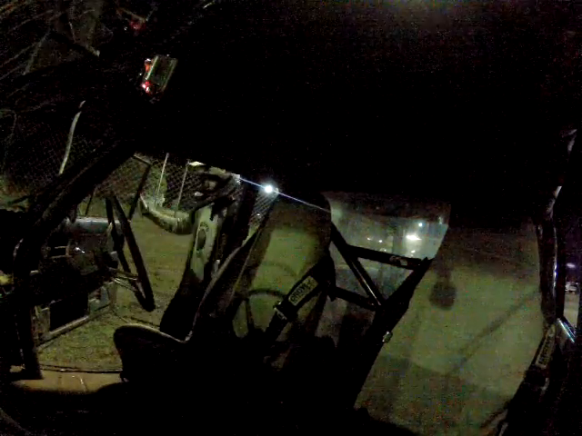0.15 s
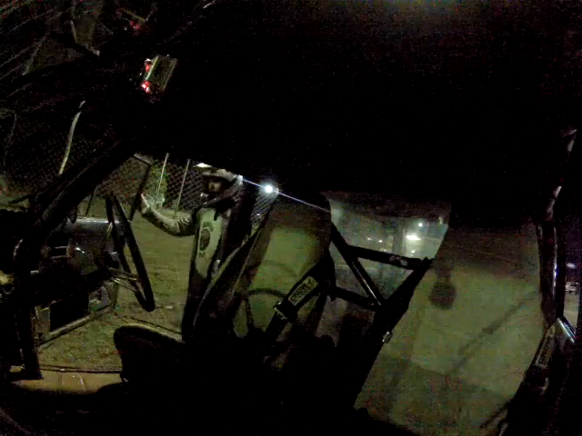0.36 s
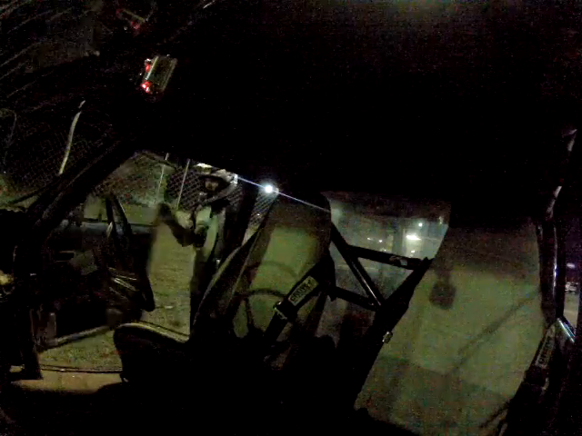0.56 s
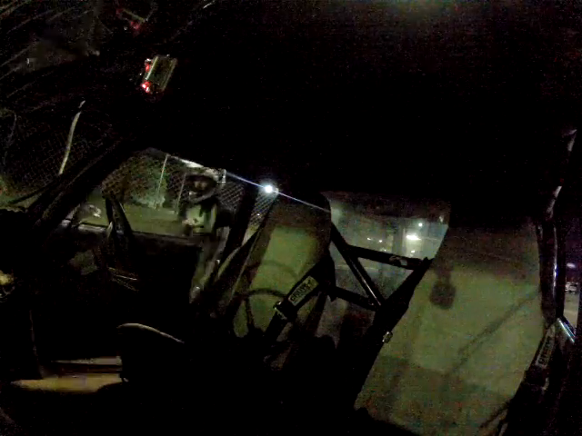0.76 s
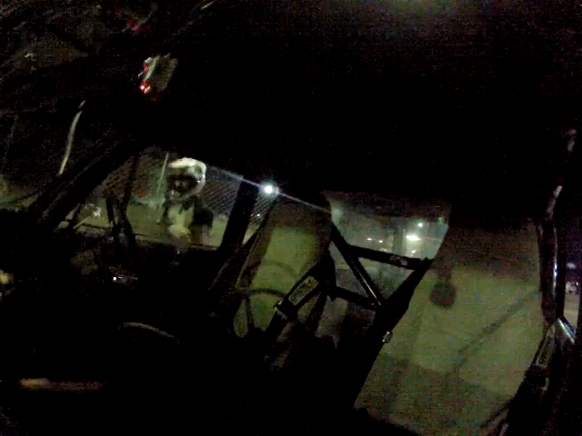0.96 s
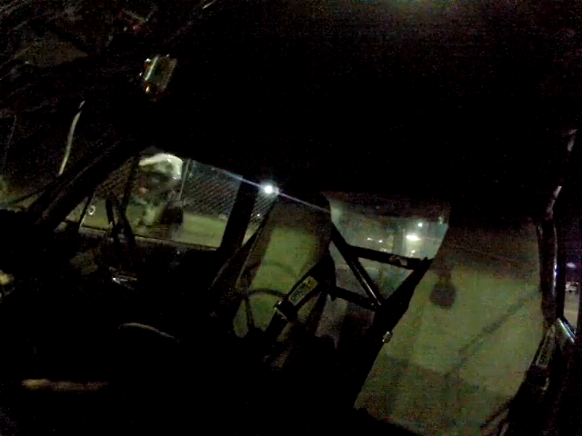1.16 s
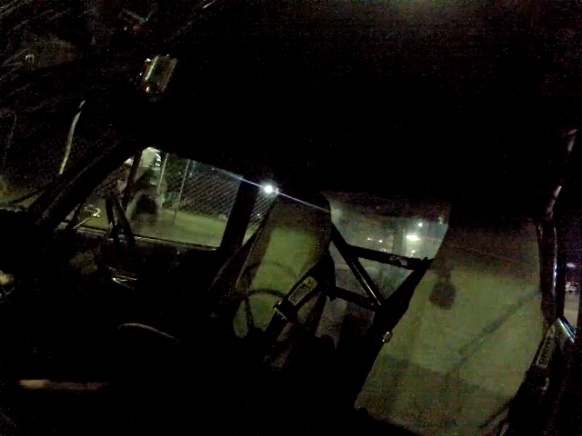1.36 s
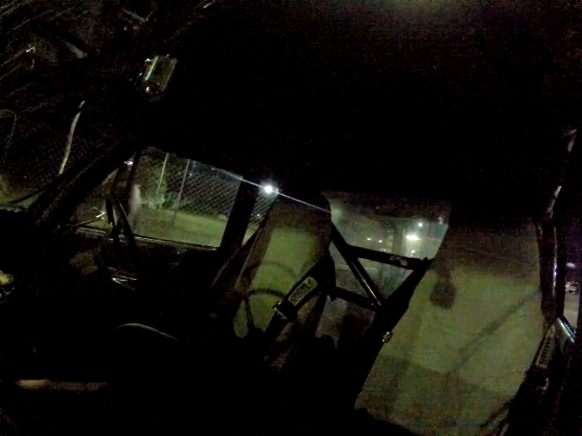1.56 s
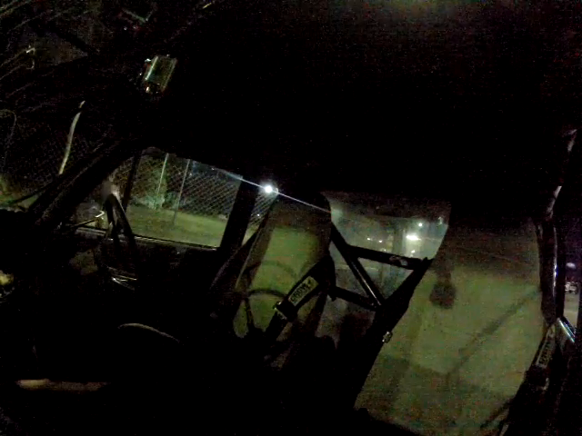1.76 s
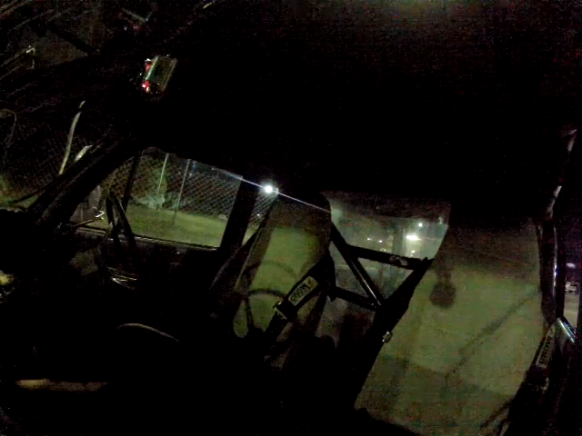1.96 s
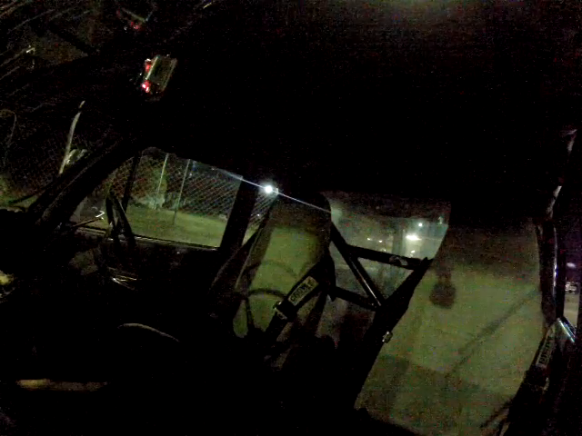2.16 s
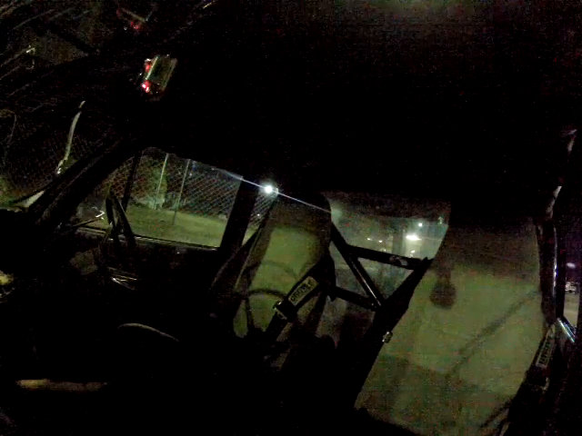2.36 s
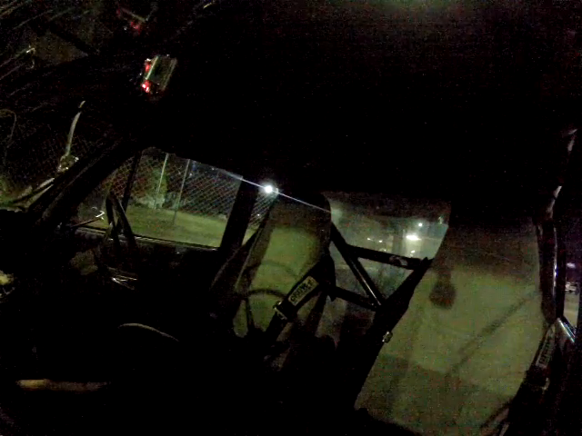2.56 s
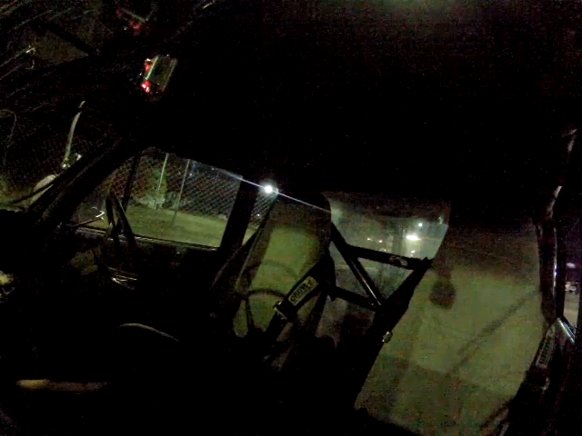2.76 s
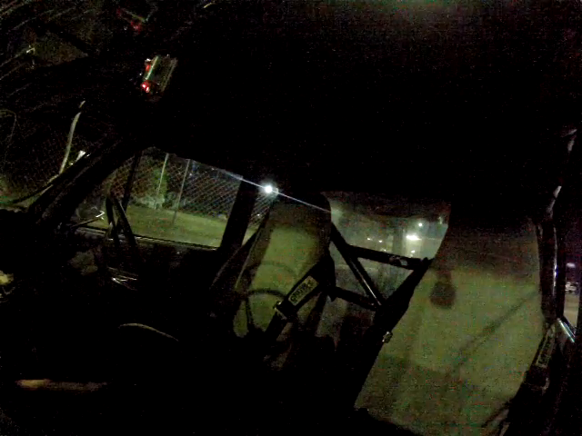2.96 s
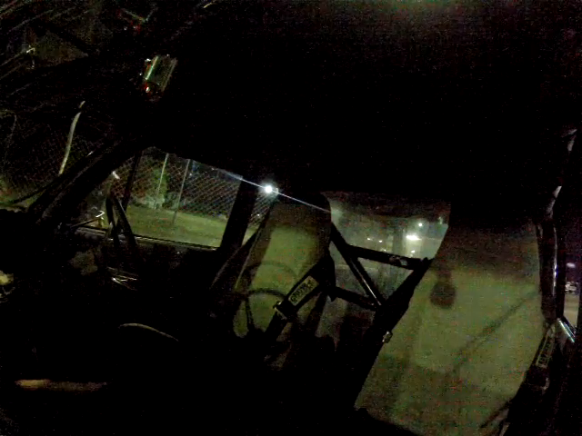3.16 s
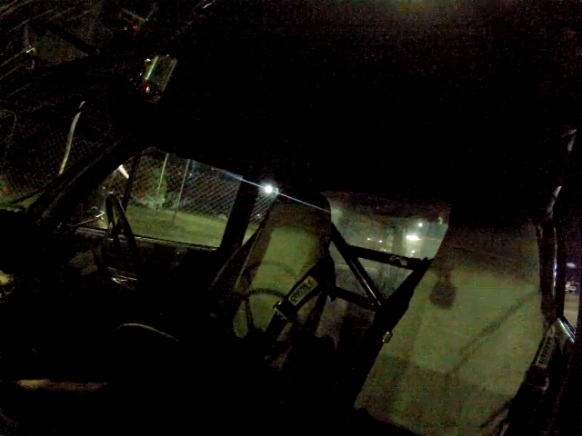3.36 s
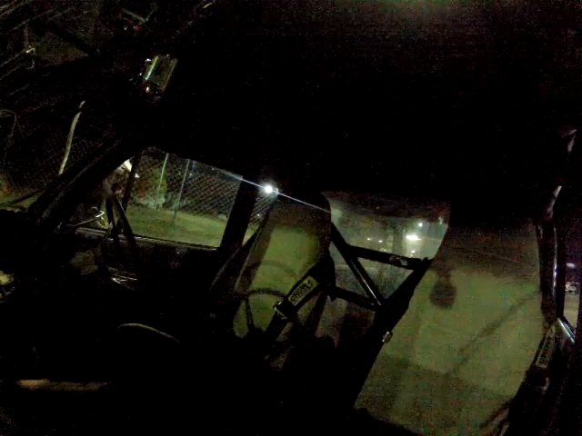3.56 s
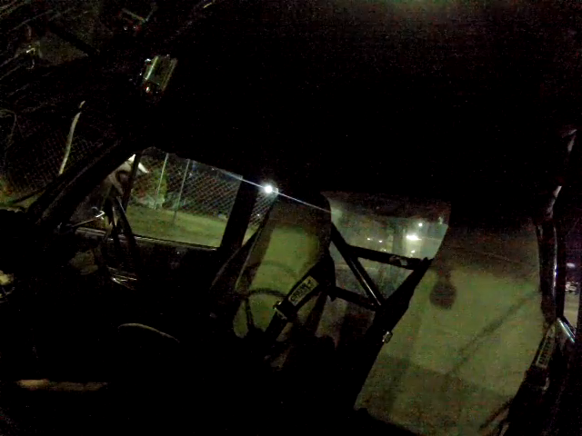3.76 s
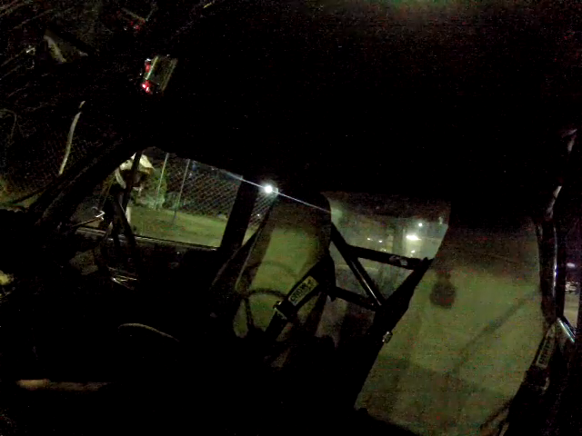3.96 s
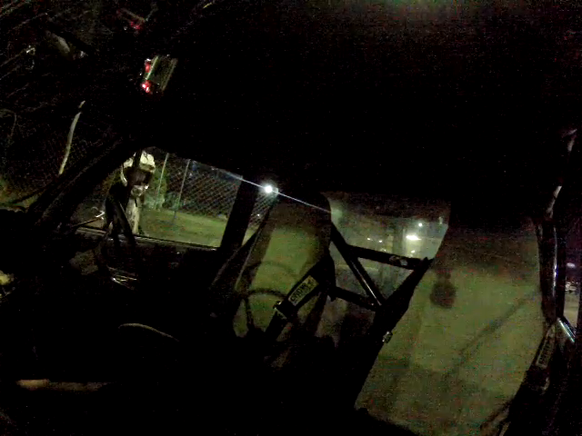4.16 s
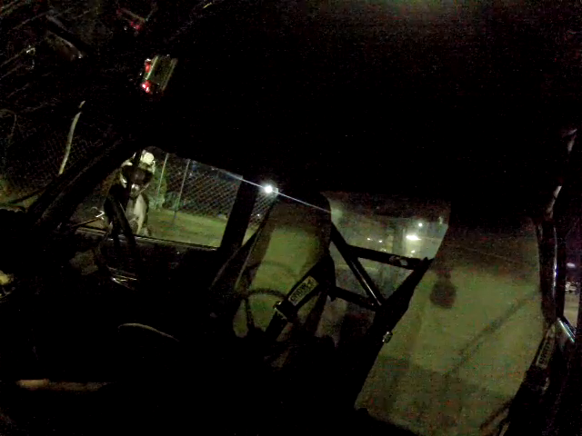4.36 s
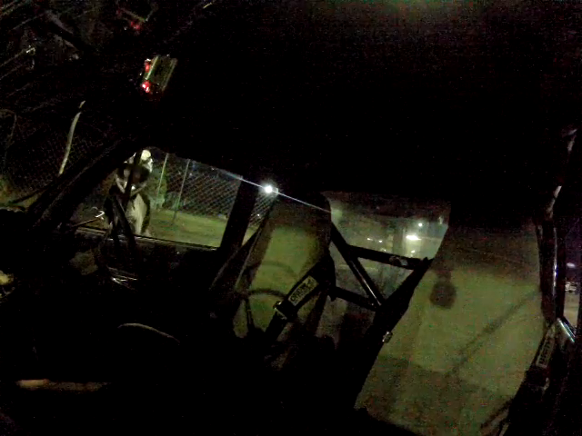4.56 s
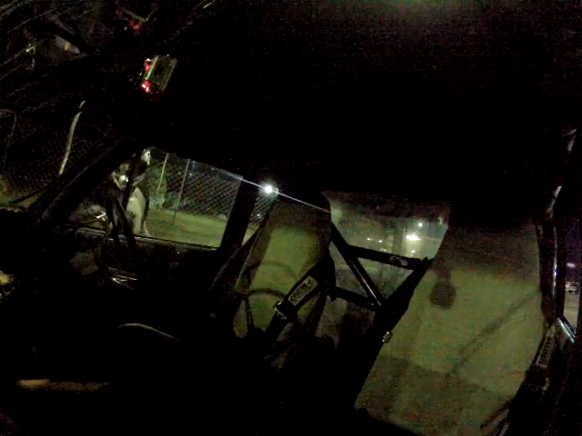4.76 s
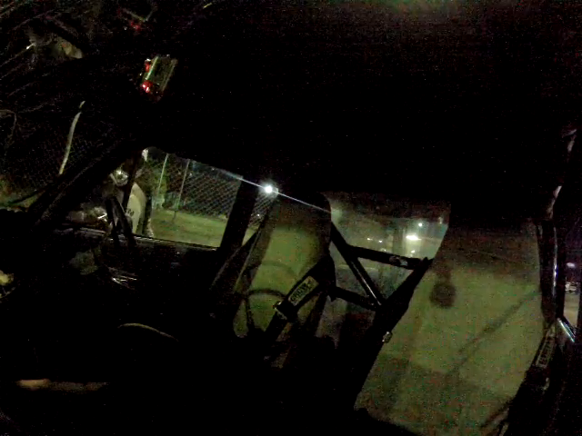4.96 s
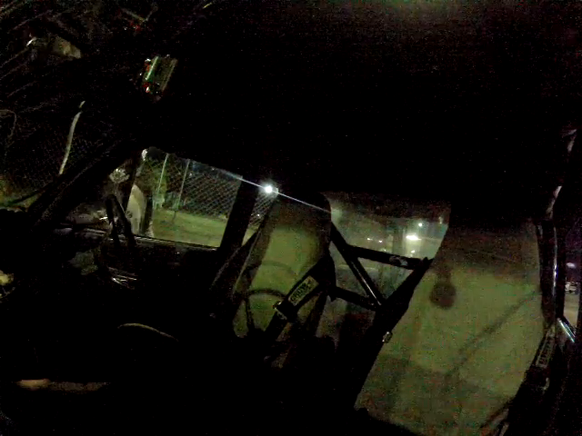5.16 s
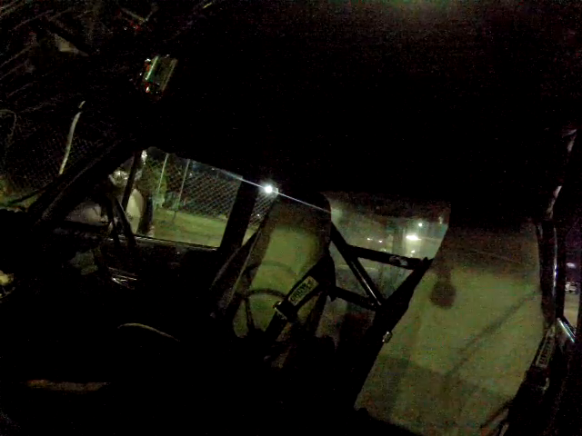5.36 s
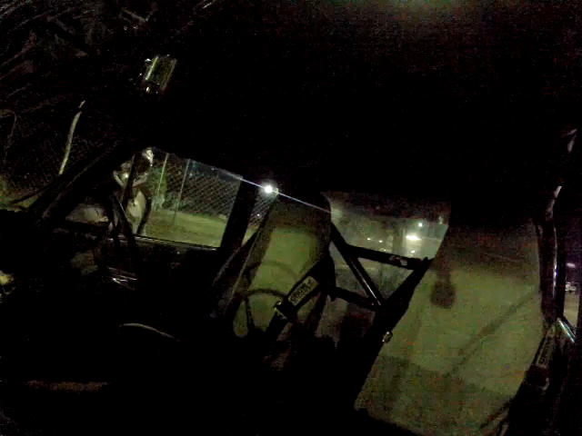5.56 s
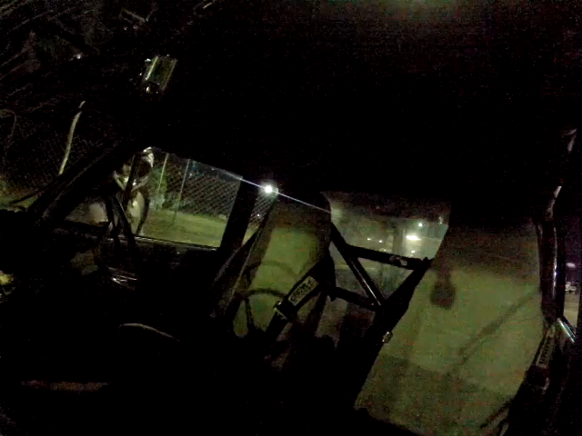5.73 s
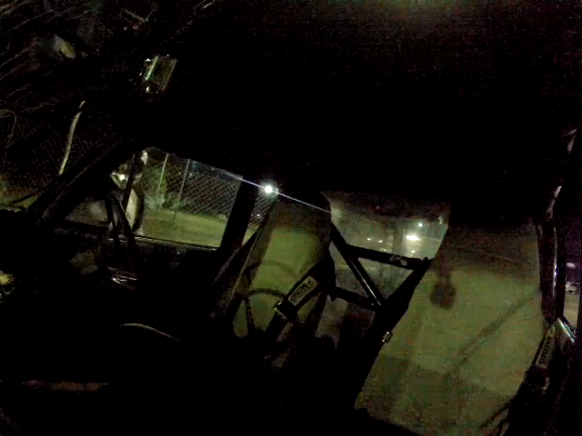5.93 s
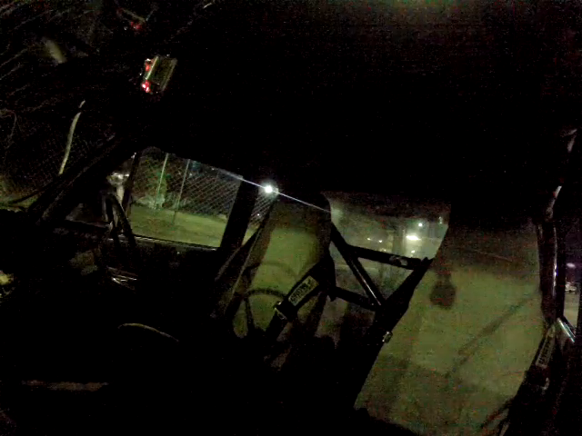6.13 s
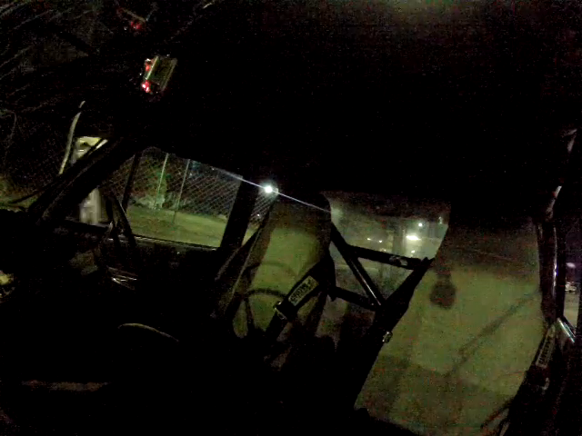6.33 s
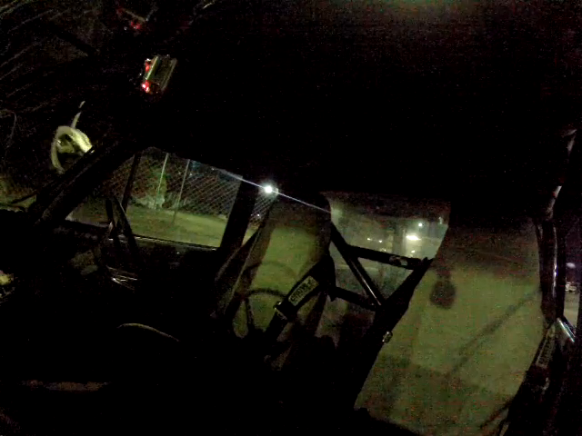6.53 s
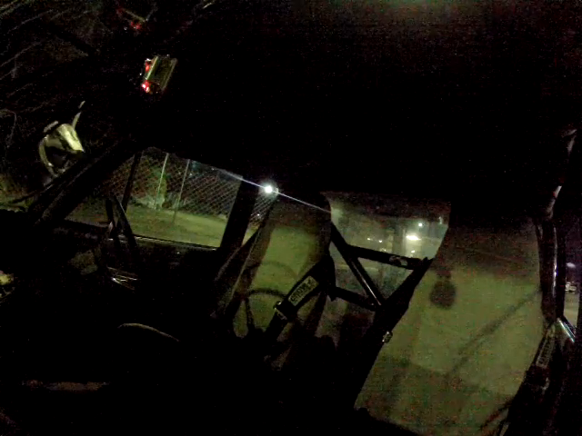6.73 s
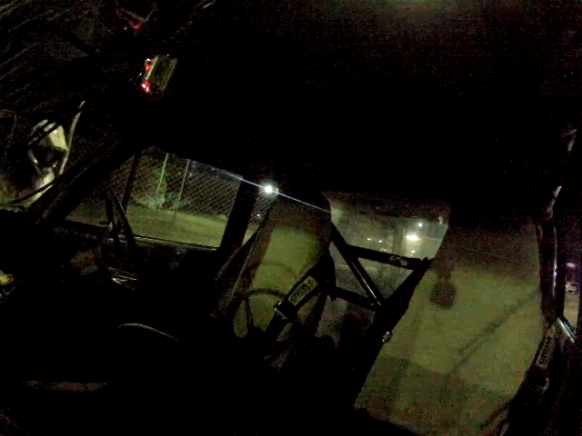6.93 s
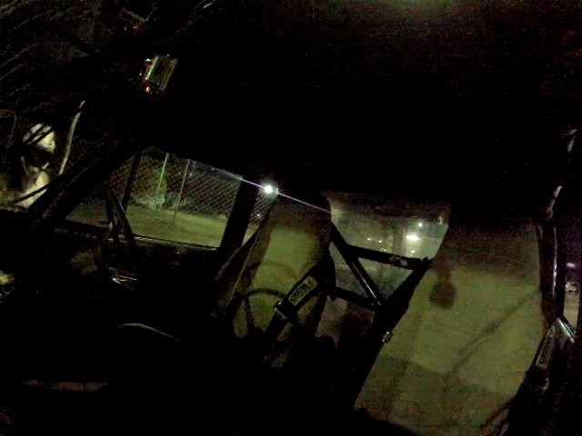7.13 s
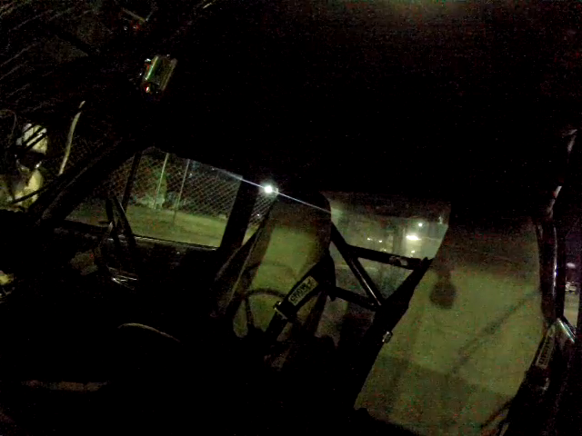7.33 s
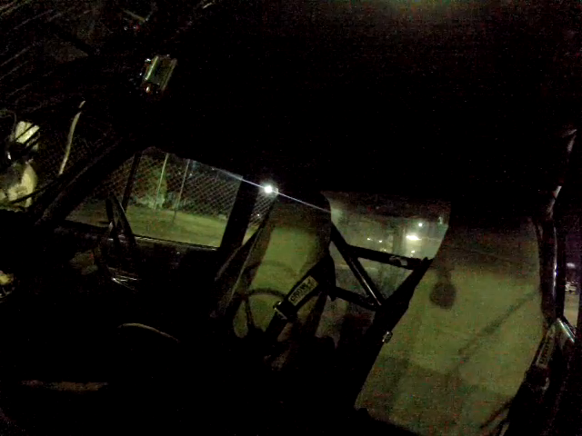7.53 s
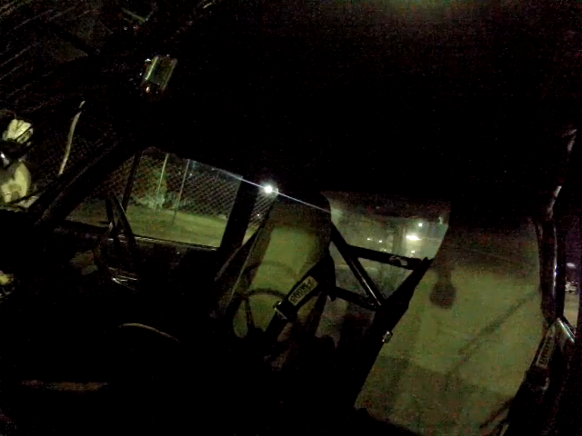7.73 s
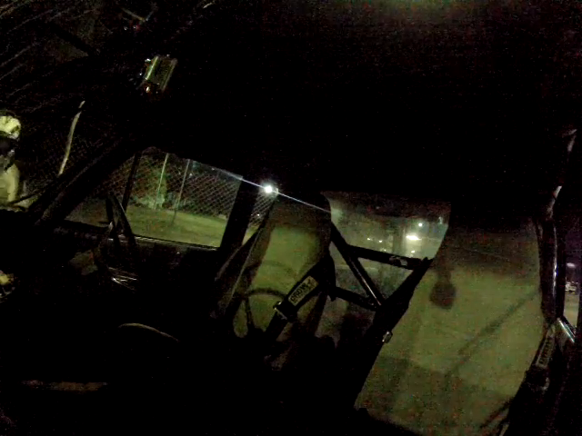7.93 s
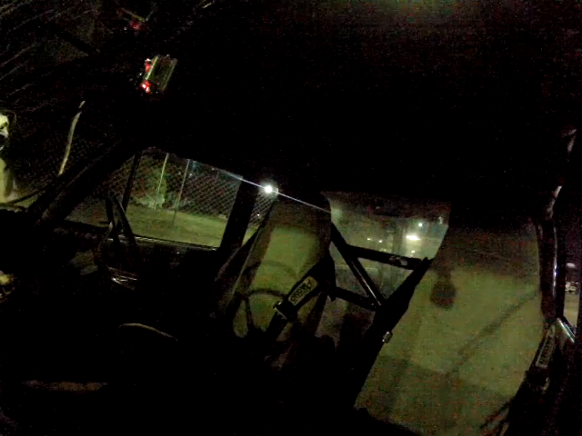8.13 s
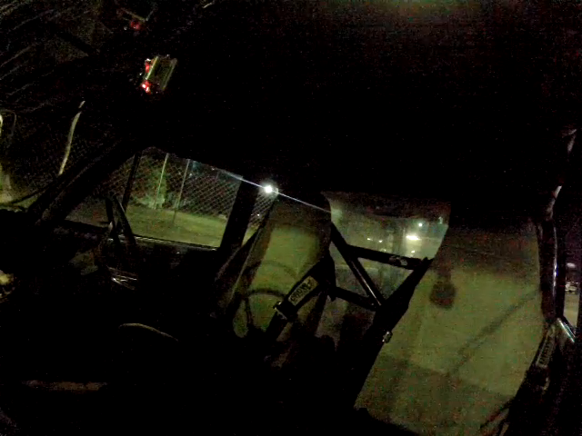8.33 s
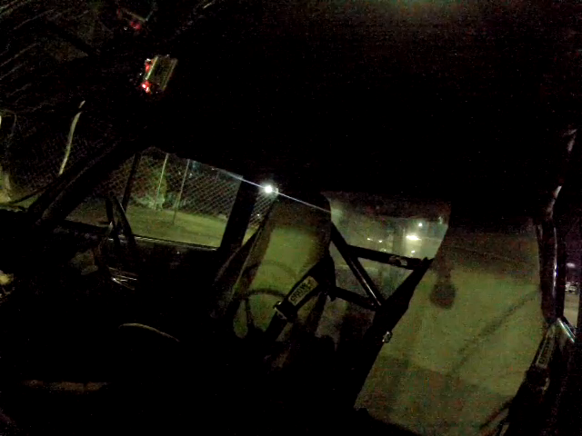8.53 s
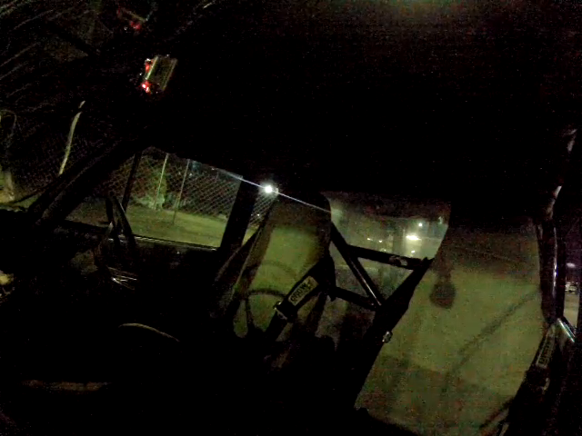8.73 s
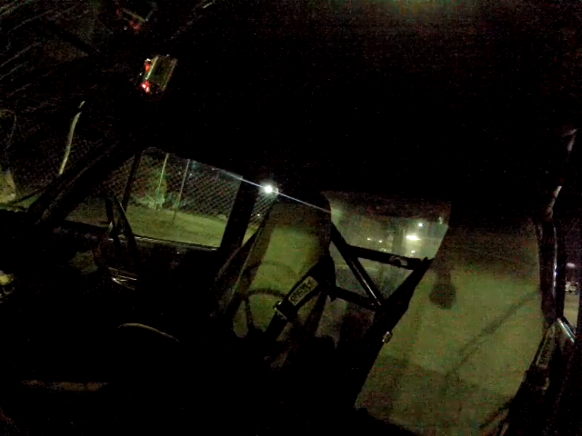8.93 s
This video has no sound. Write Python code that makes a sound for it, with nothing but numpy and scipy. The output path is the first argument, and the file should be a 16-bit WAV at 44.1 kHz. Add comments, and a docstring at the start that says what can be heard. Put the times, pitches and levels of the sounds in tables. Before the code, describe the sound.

The sound is heard from inside a stripped race car through a small, nearly mono microphone. A few gritty metal door clicks come close by in the first 0.7 seconds. At about 0.9 seconds the door slams, by far the loudest event: a deep boom, rattling panels and a brief metallic ring, slightly overloaded, with small knocks until 1.5 seconds. Outside, much quieter, a lumpy, muffled idle runs over a steady rumble of distant engines. Another engine is blipped with a raspy bark at about 2.3 and 2.6 seconds, then longer at 3.1 and 4.5. Light clicks come near 4.6 and 6 seconds, and a soft, low bump at 5.3. From about 6 seconds a car pulls away, its rough exhaust climbing in pitch. A second follows with a faint whistle, accelerating at 6.5 and 8 seconds. Both ease off around 9 seconds.

```python
"""A car door clicks a few times close to the microphone, then slams: the cabin air booms and panels rattle.
We sit inside a stripped race car at night. Outside, an eight-cylinder engine idles, another is blipped,
and two more pull away up through their revs; firings ring each exhaust pipe, and rushing gas rasps.
Far engines blur into a rumble. The microphone, all but mono, is in a small camera whose case rings
at a few pitches; the slam overloads it."""
import sys
import numpy as np
from scipy import signal
from scipy.fft import rfft, irfft
from scipy.io import wavfile
from scipy.ndimage import uniform_filter1d, map_coordinates

SR = 44100
rng = np.random.default_rng(int(sys.argv[2]) if len(sys.argv) > 2 else 0)


def file_out(sig):
    """Save sig as 16-bit WAV at sys.argv[1]."""
    # one column per channel
    cols = np.atleast_2d(sig).T
    # limit, then scale
    lim = np.clip(cols, -1, 1)
    pcm = np.round(lim * 32767).astype(np.int16)
    wavfile.write(sys.argv[1], SR, pcm)


N = 400869
TIME = np.arange(N) / SR
FREQS = np.maximum(np.arange(N + 1) * SR / (2 * N), 1)

# spectrum of a knocked body panel: pitch_hz, level_db
PANEL_SPECTRUM = [(50, -24), (110, 13), (170, -2), (240, 6), (310, -10), (440, -20.5), (560, -24),
                  (800, -50.5)]
# resonances of the latch plate and striker: pitch_hz, width_hz, level_db
STRIKER_MODES = [(1810, 30, 5), (1940, 47, 4.5), (2160, 18, -14), (2293, 21, -8), (2430, 8.5, -4),
                 (2750, 41, -8), (2920, 30, -21), (4080, 15, -5)]


def door_slam():
    """The door lands and rebounds, close by: air booms, panels thud, metal chatters, the latch rings."""
    # blows on the body shell (the door's stop, the slam, its rebounds, one late bump):
    # start_s, boom_db, thud_db, clatter_db, clatter_t60_s, latch_db
    blows = [(0.512, -56, -30.5, -54, 0.18, -51), (0.824, -45, -32, -48.5, 0.31, -51),
             (0.861, 6, -14.5, -17.5, 0.38, -24), (0.920, -1, -12.5, -29, 0.15, -43),
             (0.948, -35, -24, -15.5, 0.15, -25.5), (1.000, 3.5, -17.5, -41, 0.46, -55),
             (1.088, 0, -22, -35, 0.16, -34.5), (1.178, -24, -40, -48.5, .1, -58),
             (1.249, -9, -38.5, -57, .15, -65), (5.276, -18.5, -43.5, -61, .14, -72)]
    # modes of the door skin and roof: pitch_hz, level_db, t60_s
    skin_modes = [(86.7, 4.5, 0.65), (103.6, -11, 0.86), (231, -8, 0.62), (251.2, -8, 0.57),
                  (267, -17, 1.34), (329, -17.5, 0.67), (389, -12.5, 0.44), (440.4, -12, 0.33)]
    # spectra of the door skin's dry slap and of loose metal: pitch_hz, level_db
    slap_spectrum = [(300, 1.5), (440, 2.5), (650, -9.5), (1100, -6), (2000, -22.5)]
    clatter_spectrum = [(500, -1.5), (700, -9.5), (950, -11), (1150, -3.5), (1550, -12), (2050, 0),
                        (2900, -5.5), (3500, -9.5), (4200, -7.5), (5500, -18), (9700, -12.5),
                        (11000, -23.5), (13000, -25), (14500, -14.5), (15500, -11.5)]
    # thin ring of a metal fitting: pitch_hz, width_hz, level_db
    fitting_modes = [(11840, 63, 5), (12020, 55, -1.5), (1960, 27, -5)]
    start_s, boom_db, thud_db, clatter_db, clatter_t60_s, latch_db = np.transpose(blows)
    push_s = start_s + 0.00504  # air and panels move just after the metal touches
    boom = cabin_boom(push_s, boom_db)
    thud = colour(noise() * bursts(push_s, thud_db, t60=0.78, rise=0.0024), PANEL_SPECTRUM)
    skin = strike(push_s, thud_db - 2.5, skin_modes)
    slap = colour(noise() * bursts(push_s, thud_db - 12, t60=0.31, rise=0.0024), slap_spectrum)
    chatter = noise() * unit(undb(0.6 * walk(450)))  # many tiny metal contacts
    clatter = colour(chatter * bursts(start_s, clatter_db, clatter_t60_s, rise=0.0051), clatter_spectrum)
    latch = ringing(STRIKER_MODES) * bursts(start_s, latch_db, t60=0.19, rise=0.007)
    ring = ringing(fitting_modes) * bursts(start_s, clatter_db - 32, t60=1.53, rise=0.0062)
    clatter = cabin(clatter, t60=0.09, wet_db=-12, above_hz=860)
    return boom + thud + skin + slap + clatter + latch + ring


def cabin_boom(start_s, level_db):
    """The cabin air's main mode: it sags in pitch while the door still bounces on its seal."""
    mode_hz, sag_hz, recovery_s = 67.3, 16.9, 0.2515
    since_slam = np.maximum(TIME - start_s[np.argmax(level_db)], 0)
    turns = np.cumsum(mode_hz - sag_hz * np.exp(-since_slam / recovery_s)) / SR
    turns -= turns[since_slam == 0][-1]  # the hardest blow starts at zero phase
    swell = bursts(start_s, level_db, t60=0.25, rise=0.0047)
    after_ring = bursts(start_s, level_db - 22, t60=2.8, rise=0.02)
    return -np.sin(2 * np.pi * turns) * np.hypot(swell, after_ring)


def door_clicks():
    """Gritty metal clicks, close by; each rings the latch plate and knocks the panel behind it."""
    # latch, hinge and loose fittings: start_s, level_db, t60_s, treble_db
    clicks = [(0.107, -32, 0.099, -3), (0.332, -42.5, 0.1, 8), (0.38, -53.5, 1, -6.5),
              (0.509, -25, 0.092, -2.5), (0.62, -49.5, .11, 0.5), (0.714, -50, 0.33, -17),
              (1.232, -37, 0.042, -16), (1.489, -25.5, 0.025, -37), (1.536, -35, 0.04, -33),
              (4.609, -34, 0.058, -17), (5.848, -47.5, 0.091, -4.5), (6.086, -62, 0.26, 2),
              (6.174, -48.5, 0.13, 0.5)]
    # spectrum of the latch's grit: pitch_hz, level_db
    grit_spectrum = [(500, 8.5), (800, 2.5), (1050, 9), (1400, -2), (1900, 2), (2400, 2.5), (3300, -13.5),
                     (4300, -12.5), (5000, -22.5), (6000, -29), (8500, -17), (10100, -10), (11500, -27.5),
                     (14300, -13.5), (15500, -12.5)]
    start_s, level_db, t60_s, treble_db = np.transpose(clicks)
    bright_db = level_db + treble_db
    grit = colour(noise() * unit(undb(1.2 * walk(600))), grit_spectrum)
    low = passband(grit, "low", 3000) * bursts(start_s, level_db + 0.3, t60_s, rise=0.014)
    high = passband(grit, "high", 3000) * bursts(start_s, bright_db + 4.5, t60_s, rise=0.0042)
    ring = ringing(STRIKER_MODES) * bursts(start_s, bright_db - 10.5, t60=0.059, rise=0.0045)
    knock = colour(noise() * bursts(start_s, level_db - 9.5, t60=0.28, rise=0.002), PANEL_SPECTRUM)
    return low - high + ring + knock


def idling_engine():
    """A lumpy idle outside; only its bass gets into the cabin."""
    # loudness of the idle: time_s, level_db
    levels = [(0, -39), (0.2, -32.5), (2.2, -38), (2.8, -35.5), (3.7, -34.5), (4.25, -41.5), (4.85, -33),
              (5.8, -42.5), (9.09, -42.5)]
    # spectrum of the exhaust pipe: pitch_hz, level_db
    pipe = [(25, -50.5), (42, -6), (57, 6.5), (78, -6), (103, 5.5), (150, -11), (220, -16), (280, -13),
            (380, -40), (600, -44.5)]
    level_db, = curves(levels)
    firing_hz = 52.5 * (1 + 0.025 * walk(4))
    exhaust, _, _ = engine(firing_hz, pipe, lumpy=0.93, scatter_db=5, wander=0.02552, puff=0.4)
    return exhaust * undb(level_db - 1.5)


def blipped_engine():
    """Stabs of throttle outside: the exhaust barks and rasps as the revs climb, and dulls as they fall."""
    # stabs of throttle: start_s, held_s, firing_rise_hz, rasp_db
    stabs = [(2.27, .12, 13.1, -54.5), (2.56, 0.22, 24.5, -52.5), (3.08, .61, 60, -51),
             (4.45, 0.41, 57, -50.5)]
    # spectra of the exhaust pipe and of its gas rasp: pitch_hz, level_db
    pipe = [(40, -55.5), (70, 10), (105, 14.5), (160, 2), (215, -7), (240, -6.5), (285, 2), (335, -7),
            (400, -16.5), (600, -32), (950, -23.5), (1500, -52)]
    rasp_spectrum = [(500, -24), (720, 5), (1000, 4), (1250, -9.5), (1550, -16.5), (1950, -5), (2500, -8.5),
                     (2900, -10), (3500, -7.5), (4600, -12), (6000, -20), (9500, -13), (11000, -25),
                     (15000, -17.5)]
    # resonances of the exhaust under throttle: pitch_hz, width_hz, level_db
    bark_modes = [(807, 94, 0), (960, 62, 4), (1122, 30, -9), (2780, 31, -6), (2910, 61, -5.5)]
    rest_hz, db_per_hz, load_db = 100.7, 0.1586, 6.5
    firing_hz, drive = throttle(stabs, rest_hz, fall_s=0.62, attack_s=0.077, release_s=0.07)
    load = drive / drive.max()
    strength = drive + undb(-67.5 + 0.2 * (firing_hz - rest_hz))  # some rasp stays off the pedal
    exhaust, pulses, gas = engine(firing_hz, pipe, lumpy=2.2, scatter_db=0.9, wander=0.002, puff=0.94)
    exhaust_db = -52 + db_per_hz * (firing_hz - rest_hz) + load_db * load
    bark = unit(resonate(pulses, bark_modes)) * np.sqrt(load) * strength * undb(-8)  # dies before the rasp
    rasp = colour(gas, rasp_spectrum) * strength * undb(-5)
    return exhaust * undb(exhaust_db) + bark + cabin(rasp, t60=0.1, wet_db=4.5, above_hz=1020)


def leaving_car():
    """A car pulls away at full throttle: a rough, climbing exhaust note under a fluttering gas rasp."""
    # its run up through the revs: time_s, firing_hz, exhaust_db, rasp_db
    run = [(5.95, 130, -81, -102), (6.2, 142, -56, -58.5), (6.5, 190, -39, -54), (7, 224, -47.5, -50),
           (7.3, 246, -42.5, -49.5), (7.85, 276, -38.5, -55.5), (8, 268, -40, -53),
           (8.35, 287, -39.5, -51.5), (8.6, 272, -47, -49), (9.09, 280, -63, -51)]
    # spectra of the exhaust pipe and of its gas rasp: pitch_hz, level_db
    pipe = [(50, -38), (100, 12.5), (150, 6.5), (210, -1.5), (285, -8.5), (380, -18.5), (490, -12),
            (570, -21), (660, -36), (750, -18), (880, -40), (1200, -30.5)]
    rasp_spectrum = [(400, 1), (750, -6), (850, -5), (950, -1), (1100, -1.5), (1500, -11), (1950, -0.5),
                     (2350, -1), (2950, -5.5), (3700, -9), (4800, -13.5), (6000, -21), (8000, -15.5),
                     (9700, -10), (10800, -26.5), (14600, -13)]
    firing_hz, exhaust_db, rasp_db = curves(run)
    exhaust, _, gas = engine(firing_hz, pipe, lumpy=0.31, scatter_db=2, wander=0.005, puff=1)
    rasp = colour(gas, rasp_spectrum) * undb(rasp_db - 3 + 0.5 * walk(22))
    note = exhaust * undb(exhaust_db + 2.2 * walk(14))
    return note + cabin(rasp, t60=0.083, wet_db=-6, above_hz=450)


def chasing_car():
    """A second car follows in two long pushes; its gas whistles, a little higher as the revs rise."""
    # pushes of throttle: start_s, held_s, firing_rise_hz, whistle_db
    pushes = [(6.5, 0.97, 65.8, -61), (8.02, .75, 30.01, -56.5)]
    # spectrum of the exhaust pipe: pitch_hz, level_db
    pipe = [(80, -14), (130, 1), (210, -6), (280, 1.5), (350, -15), (450, -36.5)]
    # resonances the gas whistles through when firing at reference_hz: pitch_hz, width_hz, level_db
    whistle_modes = [(1805, 8.8, -6), (1900, 12, -8), (2268, 17, 0.5), (2360, 15, 3), (2740, 17, -3),
                     (2980, 7.8, 2), (3680, 20, -7)]
    reference_hz, glide = 216.2, 0.18
    firing_hz, strength = throttle(pushes, rest_hz=160.5, fall_s=1.8, attack_s=0.11, release_s=0.69)
    exhaust, _, gas = engine(firing_hz, pipe, lumpy=1, scatter_db=5, wander=0.012, puff=0.53)
    steady_whistle = unit(resonate(gas, whistle_modes))
    pitch_ratio = (firing_hz / reference_hz) ** glide
    whistle = map_coordinates(steady_whistle, [np.cumsum(pitch_ratio)], mode="mirror")
    return (exhaust * undb(11) + whistle) * strength


def engine(firing_hz, pipe, lumpy, scatter_db, wander, puff):
    """Eight cylinders fire unevenly into a pipe; gives exhaust, bare pulses and the gas noise after each."""
    # strength of each cylinder's firing in one cycle: level_db
    cylinders_db = [-4, -5, -5, -6, -9, -2.5, -6.5, -8.5]
    turns = np.cumsum(firing_hz * (1 + wander * walk(25))) / SR
    firing = turns.astype(int)
    uneven_db = lumpy * np.take(cylinders_db, firing, mode="wrap")
    size = undb(uneven_db + scatter_db * rng.uniform(-2.06, 2.4, N)[firing])
    pulses = np.diff(firing, prepend=0) * size / np.sqrt(firing_hz)
    gas = noise() * np.sqrt(size) * np.exp(-(turns - firing) / puff)  # puff: decay in firing periods
    return unit(colour(pulses, pipe)), unit(pulses), unit(gas)


def throttle(pushes, rest_hz, fall_s, attack_s, release_s):
    """Revs climb while the pedal is held and sink afterwards; gives firing rate and rasp strength."""
    firing_hz, strength = rest_hz, 0
    for start_s, held_s, rise_hz, level_db in pushes:
        down_s = np.clip(TIME - start_s, 0, held_s)
        lifted_s = np.maximum(TIME - start_s - held_s, 0)
        firing_hz += rise_hz * down_s / held_s * np.exp(-lifted_s / fall_s)
        strength += undb(level_db) * (1 - np.exp(-down_s / attack_s)) * np.exp(-lifted_s / release_s)
    return firing_hz, strength


def cabin(x, t60, wet_db, above_hz):
    """Bare metal walls a metre apart: dense, short reflections that comb the treble."""
    t = TIME[:SR // 4]
    tail = passband(rng.standard_normal(len(t)), "high", above_hz) * fade(t, t60)
    echo = signal.fftconvolve(x, tail / np.linalg.norm(tail))[:N]
    return (x + undb(wet_db) * echo) / np.hypot(1, undb(wet_db))


def night_background():
    """Far engines blur into a rumble; a thin, very high hiss sits on top."""
    # spectra of the rumble and the hiss: pitch_hz, level_db
    rumble_spectrum = [(30, -4.5), (60, 14), (120, 8.5), (280, -7.5), (450, -19), (750, -22.5),
                       (1050, -25.5), (1500, -30.5), (2000, -28.5), (3000, -31.5), (6000, -42),
                       (9800, -39.5), (11000, -43.5), (15000, -42.5)]
    hiss_spectrum = [(11400, -21), (11900, 9), (12150, 2), (12600, -19)]
    rumble = colour(noise(), rumble_spectrum) * undb(-42 + 1.1 * walk(5.4))
    return rumble + colour(noise(), hiss_spectrum) * undb(-78.5)


def undb(db):
    """Decibels to gain."""
    return 10 ** (np.asarray(db) / 20)


def unit(x):
    """Scale to rms 1."""
    return x / np.sqrt(np.mean(x ** 2))


def noise():
    """White noise of rms 1."""
    return rng.standard_normal(N)


def curves(rows):
    """Each column of a timed table, joined by straight lines."""
    time_s, *columns = np.transpose(rows)
    return [np.interp(TIME, time_s, column) for column in columns]


def walk(rate_hz):
    """Random levels held 1 / rate_hz seconds and smoothed twice; rms 1."""
    hold = int(SR / rate_hz)
    steps = np.repeat(rng.standard_normal(N // hold + 1), hold)
    return unit(uniform_filter1d(uniform_filter1d(steps, hold), hold)[:N])


def passband(x, kind, hz):
    """Second-order low-pass or high-pass."""
    return signal.sosfilt(signal.butter(2, hz, kind, fs=SR, output="sos"), x)


def colour(x, points):
    """Causal filter through (pitch_hz, level_db), closed at both ends; white noise keeps its level."""
    hz, db = np.transpose(points)
    octaves_outside = np.log2(np.maximum(hz[0] / FREQS, 1) * np.maximum(FREQS / hz[-1], 1))
    gain = undb(np.interp(np.log(FREQS), np.log(hz), db) - np.minimum(24 * octaves_outside, 60))
    cepstrum = irfft(np.log(unit(gain)))
    cepstrum[1:N] *= 2  # fold to minimum phase
    cepstrum[N + 1:] = 0
    return irfft(rfft(x, 2 * N) * np.exp(rfft(cepstrum)))[:N]


def resonate(x, modes):
    """Parallel resonances of (pitch_hz, width_hz, level_db)."""
    gain = sum(undb(db) / (1 + 1j * hz / width * (FREQS / hz - hz / FREQS)) for hz, width, db in modes)
    return irfft(rfft(x, 2 * N) * gain)[..., :N]


def ringing(modes):
    """Resonances driven by noise; rms 1."""
    return unit(resonate(noise(), modes))


def fade(t, t60):
    """Exponential decay that loses 60 dB in t60."""
    return np.exp(-np.log(1000) * t / t60)


def bursts(times, db, t60, rise):
    """Envelope of many blows, with t60 and rise in seconds; their powers add."""
    power, t = np.zeros(N + 2 * SR), TIME[:2 * SR]
    for start_s, gain, t60_s in zip(times, undb(db), np.broadcast_to(t60, len(times))):
        power[int(start_s * SR):][:len(t)] += (gain * (1 - np.exp(-t / rise)) * fade(t, t60_s)) ** 2
    return np.sqrt(power[:N])


def strike(times, db, modes):
    """Blows into a set of decaying modes."""
    pushes, t = np.zeros(N), TIME[:3 * SR]
    pushes[(times * SR).astype(int)] = undb(db)
    ring = sum(undb(mode_db) * np.sin(2 * np.pi * hz * t) * fade(t, t60) for hz, mode_db, t60 in modes)
    return signal.fftconvolve(pushes, ring)[:N]


def scene():
    """All sources at the microphone, all but mono; left and right differ very faintly."""
    door = door_slam() + door_clicks()
    engines = idling_engine() + blipped_engine() + leaving_car() + chasing_car()
    mid = door + engines + night_background()
    side = undb(-43.5) * cabin(mid, t60=0.015, wet_db=28, above_hz=140)
    return np.array([mid + side, mid - side])


def record(dry):
    """The camera case rings around the microphone, the slam overloads the input, and the top is cut."""
    # rings of the case: pitch_hz, width_hz, over_direct_db
    case_modes = [(980, 7.9, -5), (1100, 13, 3.5), (1976, 82, 3), (2300, 16, -1), (2858, 102, 2),
                  (4083, 72, -8), (9200, 67, -5), (9970, 36, 5), (12360, 27, -1), (11980, 30, 6.5)]
    top_hz = 15200
    clipped = np.clip(dry + resonate(dry, case_modes), -1, 1)
    return signal.sosfilt(signal.ellip(8, 0.2, 70, top_hz, fs=SR, output="sos"), clipped)


dry = scene()
out = record(dry)
file_out(out)
```